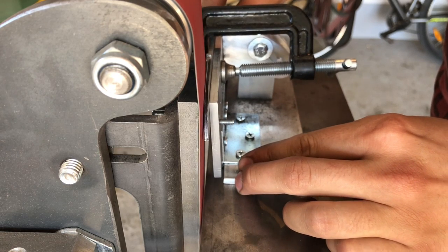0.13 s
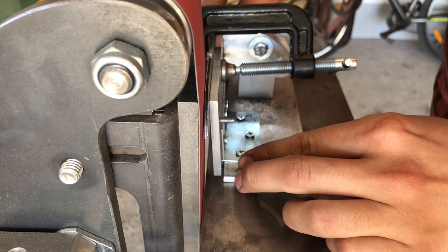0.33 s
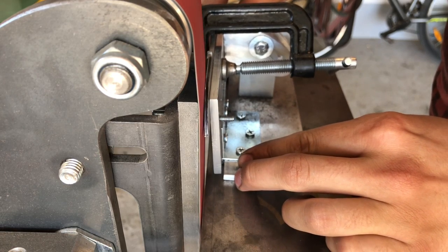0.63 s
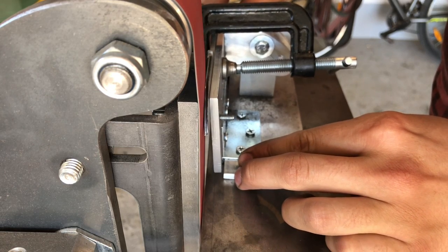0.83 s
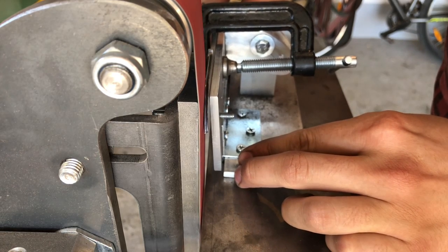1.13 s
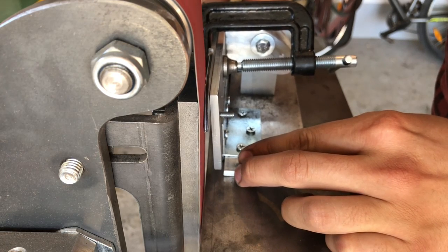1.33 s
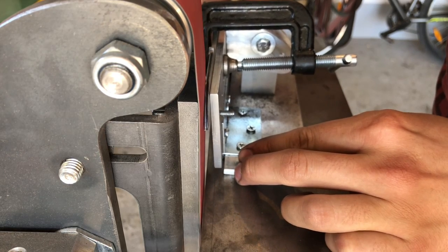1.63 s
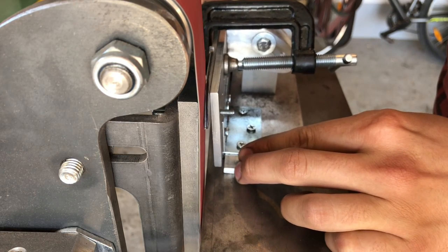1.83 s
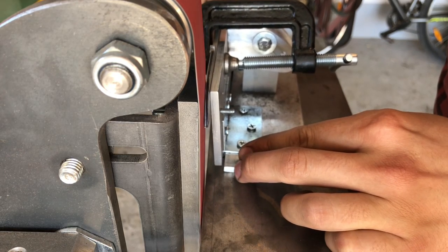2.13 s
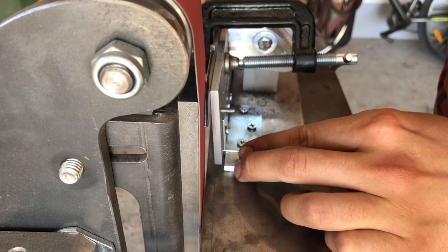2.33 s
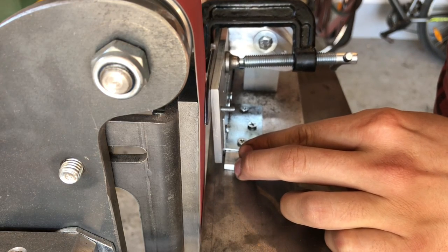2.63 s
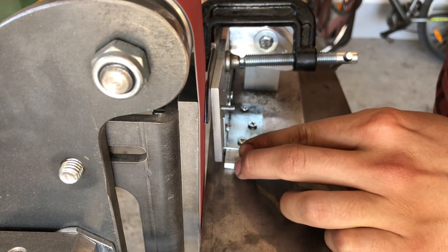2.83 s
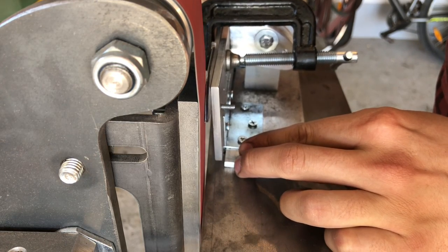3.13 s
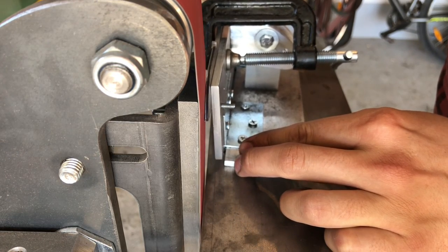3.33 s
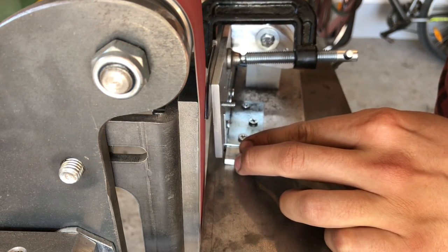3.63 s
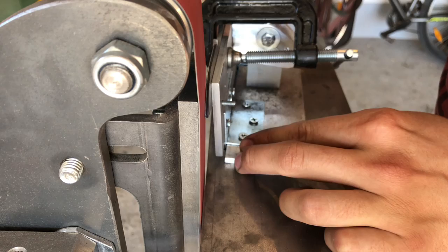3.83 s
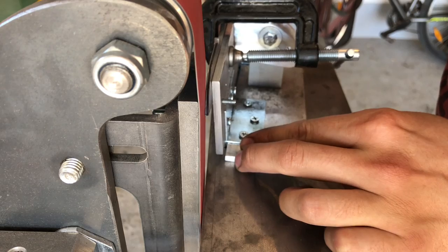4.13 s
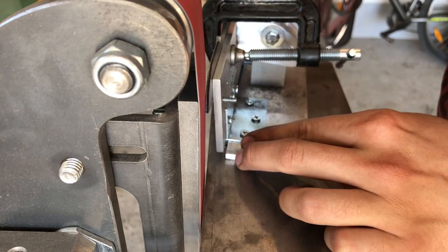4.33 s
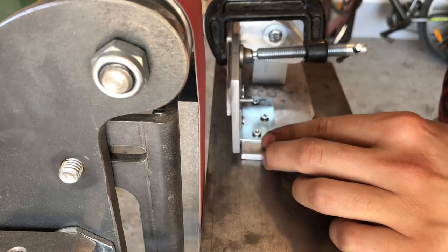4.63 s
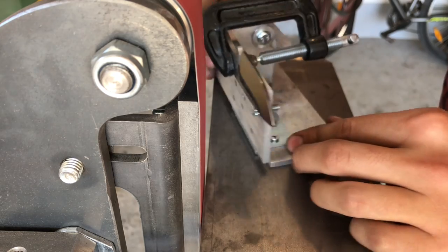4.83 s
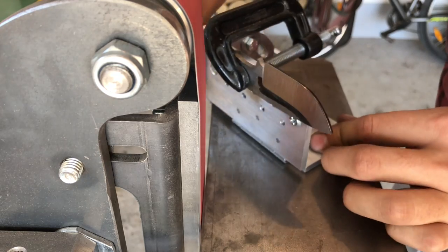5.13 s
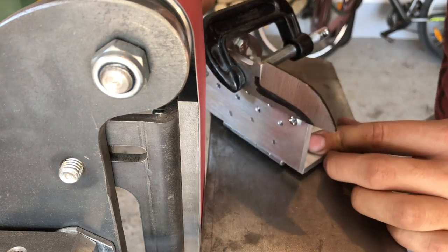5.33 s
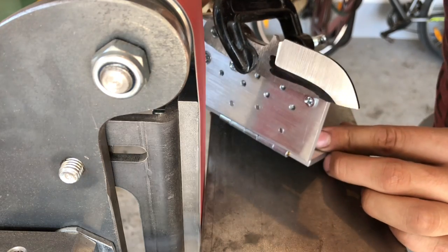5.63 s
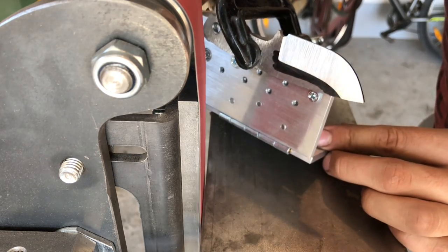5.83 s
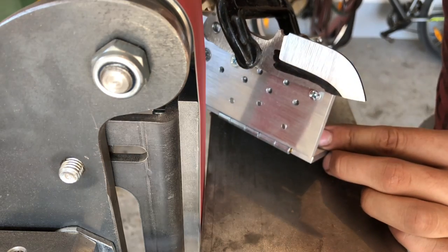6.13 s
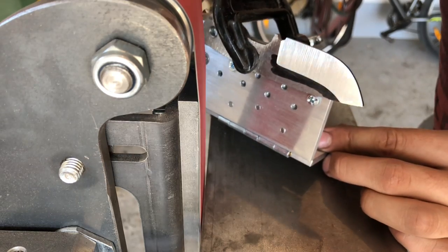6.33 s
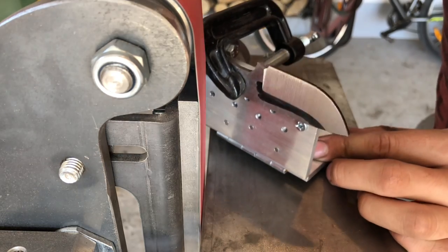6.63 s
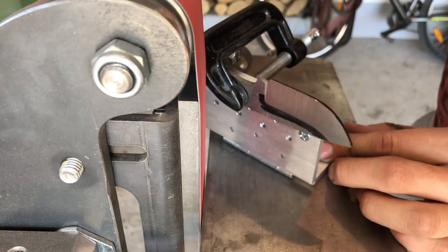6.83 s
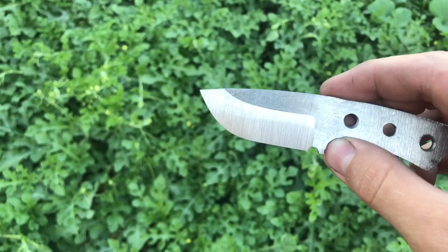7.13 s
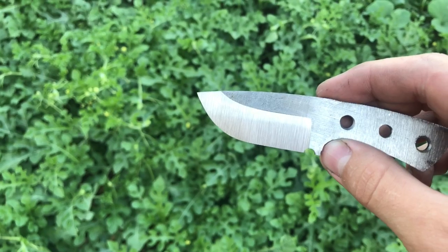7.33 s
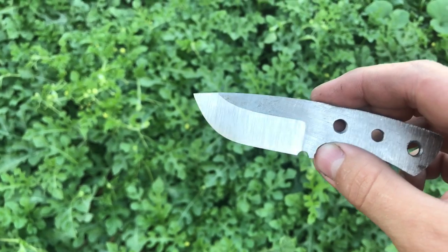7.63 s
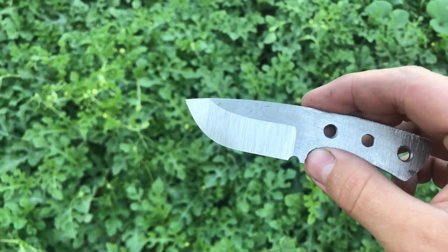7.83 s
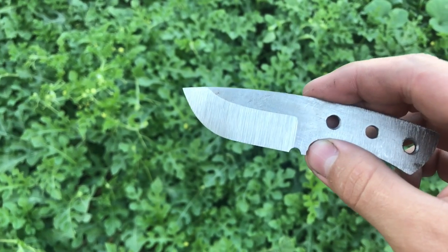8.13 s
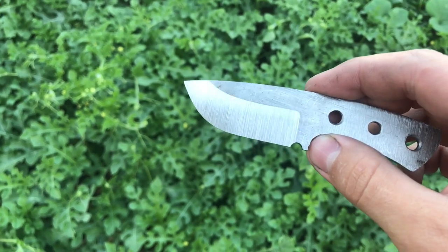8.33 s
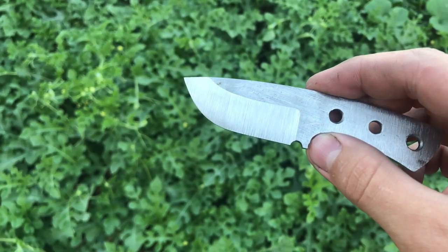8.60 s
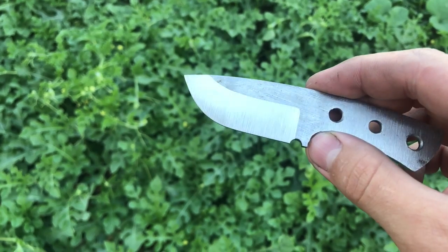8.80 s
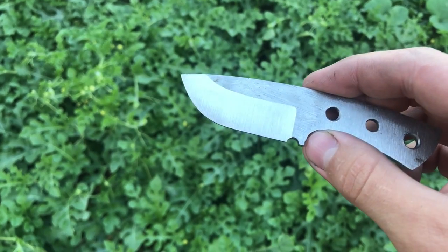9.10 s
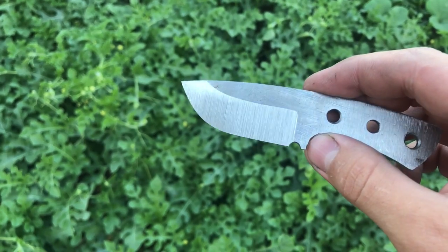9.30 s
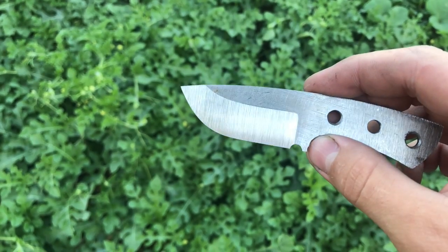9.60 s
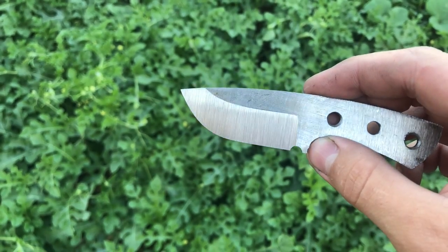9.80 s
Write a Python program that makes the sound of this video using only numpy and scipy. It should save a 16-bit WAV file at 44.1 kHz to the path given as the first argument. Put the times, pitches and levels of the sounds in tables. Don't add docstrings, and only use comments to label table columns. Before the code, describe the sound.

Close to the microphone in a workshop, a belt grinder rasps with a loud, ringing hiss that repeats several times a second as a blade is pressed on. A light metal tap comes as the blade lifts, the hiss shifts colour and runs on, then a harder clack. It cuts quickly to a very quiet garden: low traffic rumble, a whistled double chirp, faint birds and far barks.

```python
import sys
import numpy as np
from scipy import signal
from scipy.fft import rfft, irfft
from scipy.io import wavfile

SR = 44100
rng = np.random.default_rng(int(sys.argv[2]) if len(sys.argv) > 2 else 0)


def log_audio(samples):
    frames = np.atleast_2d(samples).T
    limited = np.clip(frames, -1, 1)
    pcm = np.round(limited * 32767).astype(np.int16)
    wavfile.write(sys.argv[1], SR, pcm)


def nominal_scale(level):
    x = np.asarray(level, float) / 20
    return 10 ** x


N = 439236
T = np.arange(N) / SR
HZ = np.maximum(np.arange(N // 2 + 1) * SR / N, 1)


def rms_one(x):
    return x / np.sqrt(np.mean(x ** 2) + 1e-20)


def at_hz(points):
    hz, value = np.transpose(points)
    return np.interp(np.log(HZ), np.log(hz), value)


def band(hz, half_hz):
    return 1 / (1 + ((HZ - hz) / half_hz) ** 4)


def colour(x, gain, low_hz, high_hz):
    bins = rfft(x) * gain
    inside = (HZ > low_hz) & (HZ < high_hz)
    return irfft(bins, N) * N / np.sqrt(2 * np.sum(np.abs(bins[inside]) ** 2))


def drift(rate):
    return rms_one(irfft(rfft(rng.standard_normal(N)) / (1 + (HZ / rate) ** 2), N))


def swell(middle_s, half_s):
    return np.exp(-.5 * ((T - middle_s) / half_s) ** 2)


def add(out, s, sound):
    part = out[round(s * SR):round(s * SR) + len(sound)]
    part += sound[:len(part)]


def looped(turns, top):
    ripples = rng.standard_normal(top) + 1j * rng.standard_normal(top)
    surface = rms_one(irfft(ripples, 16 * top))
    return np.interp(turns % 1 * len(surface), np.arange(len(surface) + 1), np.append(surface, surface[0]))


# [t/s, turn/ms]
BELT_TURN = [(0, 135.82), (2.6, 135.78), (3.9, 135.6), (4.4, 135.5), (4.65, 135.3), (10, 135.3)]
# [f/Hz, share of power]
REPEAT = [(60, .5), (250, .65), (600, .74), (880, .45), (1100, .82), (2000, .42), (4200, .62), (6500, .48),
          (10000, .36), (15000, .2)]
LIFT_S = (4.38, 4.62)


def grit():
    slip = np.interp(T, LIFT_S, [2.6e-4, 1.7e-4]) * drift(1.2)
    turn_s, turn_ms = np.transpose(BELT_TURN)
    turns = np.cumsum(1000 / np.interp(T, turn_s, turn_ms) / SR) + slip
    belt = looped(turns, top=2400)

    wobble = np.sqrt(2) * np.cos(2 * np.pi * 4.7 * turns)
    wheel = wobble * looped(turns, top=2400)
    with_wheel = .07 + .32 * band(1085, 150)
    again = rfft(belt) * np.sqrt(1 - with_wheel) + rfft(wheel) * np.sqrt(with_wheel)

    lumps = nominal_scale(1.5 * looped(turns, top=50))
    fresh = rfft(rms_one(lumps * rng.standard_normal(N)))

    splice_s, slap_db, slap_hz, half_hz = 5.266, 35, 930, 130
    passes = np.diff(np.floor(turns - turns[round(splice_s * SR)]), prepend=0) == 1
    slaps = rfft(passes * (1 + 0.13 * wobble)) * nominal_scale(slap_db) / (1 + ((HZ - slap_hz) / half_hz) ** 2)

    share = at_hz(REPEAT)
    return irfft(again * np.sqrt(share) + fresh * np.sqrt(1 - share) + slaps, N)


# [f/Hz, level/dB per Hz]
FRAME = [(30, -55), (45, -45.5), (70, -46.5), (115, -24), (150, -14.5), (230, -21.5), (480, -14.5),
         (590, -22.5), (750, -19), (1450, -17.5), (2000, -20.5), (3150, -18), (5300, -14.5), (10500, -15.5),
         (15600, -23.5)]
# [f/Hz, width/Hz, level/dB
# pressed hard, level/dB pressed lightly, level/dB drawn away]
RESONANCES = [(184, 66, -10.5, -14, -12), (251.4, 19, -18.5, -17, -15.5), (307, 53, -13, -15.5, -21.5),
              (401, 39, -10.5, -10.5, -7), (666, 69, -18.5, -17, -19), (835, 40, -17, -14.5, -11),
              (896, 72, -20, -17, -17.5), (1075.6, 81, -1, -1.5, -1), (1138, 40, -9.5, -6.5, 0),
              (1276, 89, -12.5, -13.5, -11), (1639, 47, -19, -20.5, -17),
              (1765, 45, -8, -8, -7.5), (2358, 65, -13, -14, -6.5), (2530, 310, -15, -16, -14.5),
               (2875, 89, -13.5, -13.5, -10), (3460, 150, -14.5, -15, -15), (3750, 350, -8.5, -8.5, -10),
               (3965, 105, -9.5, -12, -6), (4040, 150, -8, -8, -7), (4274, 130, -3.5, -3.5, -2),
               (4466, 216, -8, -8.5, -6),
              (4960, 370, -15, -12.5, -10.5), (5640, 350, -10.5, -13.5, -12.5),
             (6125, 330, -9.5, -12.5, -8.5), (6594, 400, -8, -10.5, -7), (7310, 410, -11, -14.5, -16),
             (8360, 1180, -10.5, -11.5, -10.5), (9070, 1200, -11.5, -15, -12.5),
             (12350, 3400, -14.5, -18.5, -19.5)]


def resonant(stage):
    hz = np.geomspace(20, SR / 2, 3000)
    power = np.zeros(len(hz))
    for centre_hz, width_hz, *stage_db in RESONANCES:
        power += nominal_scale(stage_db[stage]) ** 2 / (1 + (2 * (hz - centre_hz) / width_hz) ** 2) ** 2
    return np.sqrt(nominal_scale(at_hz(FRAME)) ** 2 + np.interp(HZ, hz, power))


# [f/Hz, half width/Hz]
SHADED = [(1775, 45), (2420, 200), (3800, 260)]
# [middle t/s, half length/s, then level/dB of each shaded resonance]
MOVES = [
    (.7, .2, 1.5, -0.5, -.5),
    (3.75, .25, 3.5, -0.5, -0.8),
    (4.75, .22, -3.5, -3, 1),
    (5.15, .22, -1, 3, 0.7),
    (5.8, .17, -3.5, -0.5, -1.5),
    (6.55, .12, -3, -.3, -0.7),
    (6.94, .07, 3, 2, 3),
]


def grinder():
    source = grit()
    hard, light, away = (colour(source, resonant(stage), 300, 5000) for stage in range(3))
    eased = np.interp(T, (1.9, 2.2), [0, 1])
    lifted = np.interp(T, LIFT_S, [0, 1])
    whole = hard * (1 - eased) + light * (eased - lifted) + away * lifted

    bins = rfft(whole)
    swings_db = sum(np.outer(db, swell(s, half_s)) for s, half_s, *db in MOVES)
    for (hz, half_hz), swing_db in zip(SHADED, swings_db):
        whole = whole + (nominal_scale(swing_db) - 1) * irfft(bins * band(hz, half_hz), N)

    scrape_db = 2.5 * swell(4.33, .1)
    whole = whole + (nominal_scale(scrape_db) - 1) * irfft(bins * band(8400, 600), N)
    start_db, rise_db_per_s = -31.5, 0.09
    return nominal_scale(start_db + rise_db_per_s * T) * whole


# [f/Hz, level/dB rms]
HUM = [(48.6, -72.5), (79.4, -61.5), (86.2, -59), (100, -58), (177, -61.5), (200, -55), (678, -63)]


def motor():
    waver = nominal_scale(1.333 * drift(1.6))
    out = np.zeros(N)
    for k, (hz, db) in enumerate(HUM):
        tone = np.sin(2 * np.pi * (hz * T + rng.random()))
        out += np.sqrt(2) * nominal_scale(db) * np.roll(waver, k * SR) * tone
    return out


# [t/s, peak level/dB]
TAPS = [
    (4.05, -19),
    (6.841, -13.5),
]
# [f/Hz, level/dB, t60/s]
JIG = [(614, -4.5, 0.05), (856, 0.5, 0.065), (1050, -2, .04), (1400, -2, .03), (1757, -1, 0.09),
       (2100, -1, .03), (2370, -4, .04), (3800, -10, .04)]


def taps():
    out, t = np.zeros(N), T[:SR // 5]
    ring = sum(nominal_scale(db - 60 * t / t60) * np.sin(2 * np.pi * hz * t) for hz, db, t60 in JIG)
    onset = np.minimum(1, t / .001)
    for s, peak_db in TAPS:
        add(out, s, nominal_scale(peak_db - 16) * onset * ring)
    return out


# [f/Hz, level/dB per Hz]
GARDEN = [(18, -56), (30, -22), (59, 1), (79, 7), (103, -7.5), (277, -4.5), (316, -0.5), (411, -7.5),
          (675, -21.5), (1230, -29), (3700, -38.5), (9740, -41.5), (15600, -48)]


def garden_air(white):
    surge_db, surges_per_s = 2.0, 5.5
    lull_db = -2.5 * swell(8.3, .3)
    rumble_db = -63 + lull_db + surge_db * drift(surges_per_s)
    drone_db = -66.5 - 1.8 * (T - FADE_S[1]) + surge_db * drift(surges_per_s)
    shape = nominal_scale(at_hz(GARDEN))
    low = 1 / (1 + (HZ / 200) ** 8)
    high = 1 / (1 + (570 / HZ) ** 8)
    rumble = nominal_scale(rumble_db) * colour(white, shape * np.sqrt(low), 40, 200)
    drone = nominal_scale(drone_db) * colour(white, shape * np.sqrt((1 - low) * (1 - high)), 200, 550)
    bed = nominal_scale(-70) * colour(white, shape * np.sqrt(high), 600, 15600)
    return rumble + drone + bed


def insect(white):
    hz, width_hz, level_db = 9550, 180, -102
    return nominal_scale(level_db) * colour(white, 1 / (1 + ((HZ - hz) / width_hz) ** 2), 9000, 10500)


# [middle t/s, half length/s, level/dB]
FLOCK_STIRS = [(7.62, .2, 4.5), (8.35, .17, 6.8), (9.25, .25, 4.5)]


def flock():
    stirs_db = sum(db * swell(s, half_s) for s, half_s, db in FLOCK_STIRS)
    level_db = -84 + stirs_db + 2.5 * drift(8.3)
    return nominal_scale(level_db) * colour(rng.standard_normal(N), band(3700, 750), 2500, 5500)


def note(rows, pitch=1, gain_db=0):
    at, hz, db = np.transpose(rows)
    t = T[:round(at[-1] * SR)]
    edge = np.clip(np.minimum(t - at[0], at[-1] - t) / .003, 0, 1)
    burr = 1 + .024 * np.sin(2 * np.pi * (170 * t + rng.random()))
    phase = 2 * np.pi * np.cumsum(burr * pitch * np.interp(t, at, hz)) / SR
    return edge * nominal_scale(np.interp(t, at, db) + gain_db) * np.sin(phase)


# [t/s, f/Hz, level/dB]
FAR_BIRDS = [(7.235, 3600, -76), (7.79, 4400, -80), (8.13, 3200, -79), (8.172, 4750, -80),
             (8.545, 3600, -74), (8.75, 4400, -80), (8.94, 4050, -76), (8.975, 3650, -77),
             (9.33, 4400, -78), (9.63, 4460, -81)]


def far_birds():
    out = np.zeros(N)
    for s, hz, db in FAR_BIRDS:
        peep = [(0, .94 * hz, -2), (.01, 1.02 * hz, 6), (.022, .96 * hz, -4)]
        add(out, s, note(peep, gain_db=db))
    return out


# [t/s, level/dB, low throat f/Hz, high throat f/Hz]
BARKS = [
    (7.27, -68, 640, 800),
    (8.855, -63, 640, 850),
    (9.85, -63.5, 620, 860),
]


def dog():
    out, t = np.zeros(N), T[:SR // 2] / .045
    hz = HZ[:len(t) // 2 + 1] * N / len(t)
    for s, db, low_hz, high_hz in BARKS:
        throat = sum(1 / (1 + ((hz - centre) / 40) ** 2) for centre in (low_hz, high_hz))
        voice = rms_one(irfft(rfft(rng.standard_normal(len(t))) * throat, len(t)))
        add(out, s, nominal_scale(db) * t * np.exp(1 - t) * voice)
    return out


# [t/s after its start, f/Hz, level/dB]
CHIRP = [
    [(0, 3850, -14), (.012, 4240, -3), (.025, 4150, 0), (.036, 3950, -4)],
    [(.02, 4550, -16), (.033, 4400, -3), (.036, 4800, -3), (.044, 4800, -14)],
    [(.047, 3170, -13), (.056, 3530, 1), (.066, 3750, 2), (.074, 3700, -2), (.084, 3150, -8),
     (.094, 2950, -16)],
]
# [t/s, level/dB, pitch factor, last note level/dB]
SPARROW = [
    (7.441, -63, 1.0, -3),
    (8.296, -62, 1.01, -3),
    (9.078, -62, 1.02, 1),
    (9.915, -77, 1.01, -4),
]


def sparrow():
    out = np.zeros(N)
    for s, db, pitch, last_db in SPARROW:
        for rows, more_db in zip(CHIRP, (0, 0, last_db)):
            add(out, s, note(rows, pitch, db + more_db))
    return out


def birds():
    far, near = far_birds(), sparrow()
    t = T[:SR // 4]
    decay = nominal_scale(-60 * t / .4) * (.3 + .7 / (1 + (t / .075) ** 6))
    echoes = rng.standard_normal(len(t)) * decay * (t > .008)
    echoes = echoes / np.sqrt(np.sum(echoes ** 2))
    wet = signal.oaconvolve(nominal_scale(3.5) * near + far, echoes)[:N]
    return near + far + wet + flock()


def garden():
    white = rng.standard_normal(N)
    return garden_air(white) + insect(white) + birds() + dog()


# [t/s workshop starts to fade, t/s it is gone, t/s garden is up]
FADE_S = (7.05, 7.085, 7.125)


def scene():
    shop = np.interp(T, FADE_S[:2], [1, 0]) * (grinder() + motor() + taps())
    outside = np.interp(T, FADE_S[1:], [0, 1]) * garden()
    return np.tile(shop + outside, (2, 1))


def roll_off(x):
    return signal.sosfilt(signal.butter(12, 16890, fs=SR, output="sos"), x)


NOISE_FILL_S = [1.008, 1.797, 1.936, 2.052, 2.076, 2.099, 2.819, 3.306, 3.724, 3.98, 4.955, 5.187, 5.814,
                6.952, 7.416, 7.532, 7.649, 7.695, 8.275, 8.461, 8.786, 8.949, 9.251, 9.274, 9.32, 9.344,
                9.46]


def record(dry):
    side, half = np.zeros(N), 1024
    window = np.clip(1.6 * np.hanning(2 * half), 0, 1)
    hz = np.arange(half + 1) * SR / (2 * half)
    for s in NOISE_FILL_S:
        part = slice(round(s * SR) - half, round(s * SR) + half)
        low_hz = rng.uniform(4800, 14500, size=2)
        width_hz = rng.uniform(1000, 2600, size=2)
        first, second = (hz > low_hz[:, None]) & (hz < (low_hz + width_hz)[:, None])
        filled = first | second & (rng.random() < .45)
        bins = np.abs(rfft(dry[0, part])) * filled
        random_phase = np.exp(2j * np.pi * rng.random(half + 1))
        side[part] += nominal_scale(-2.5) * window * irfft(bins * random_phase)
    rounded = .45 * np.tanh((dry + side * [[1], [-1]]) / .45)
    top_cut = signal.ellip(14, .3, 75, 15700, fs=SR, output="sos")
    return roll_off(signal.sosfilt(top_cut, rounded))


dry = scene()
out = record(dry)
log_audio(out)
```